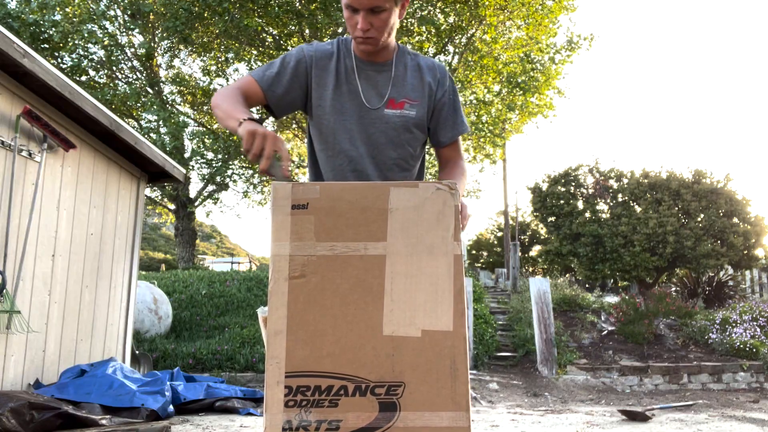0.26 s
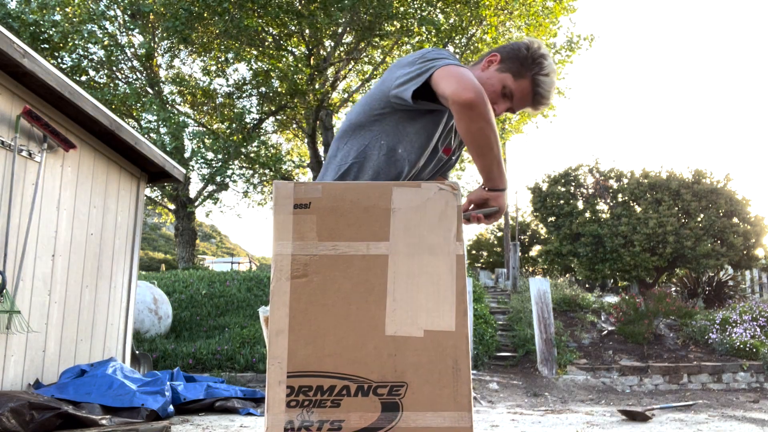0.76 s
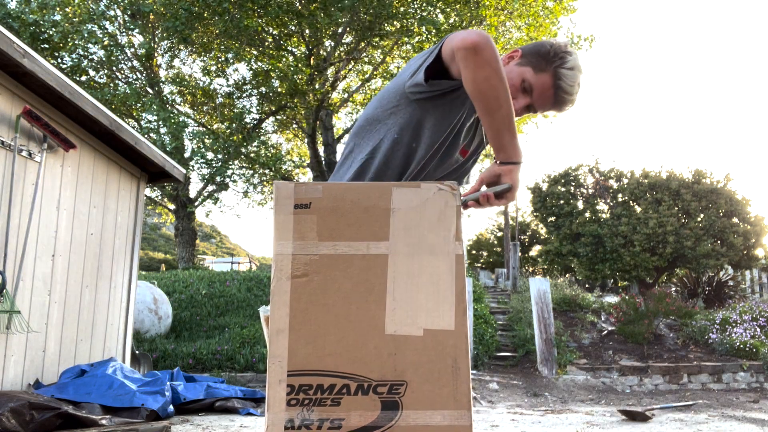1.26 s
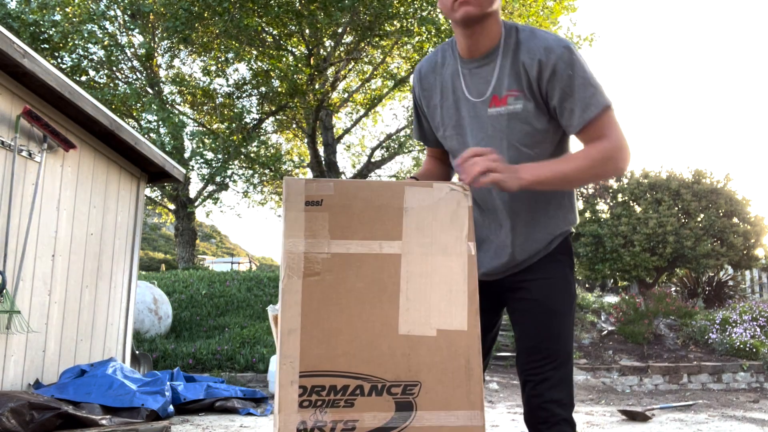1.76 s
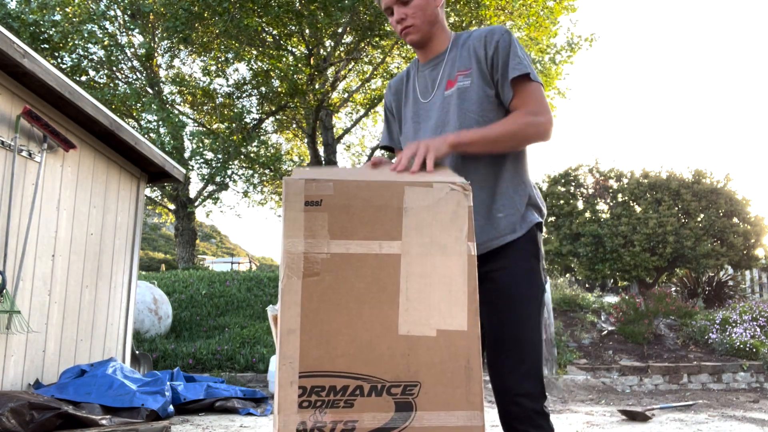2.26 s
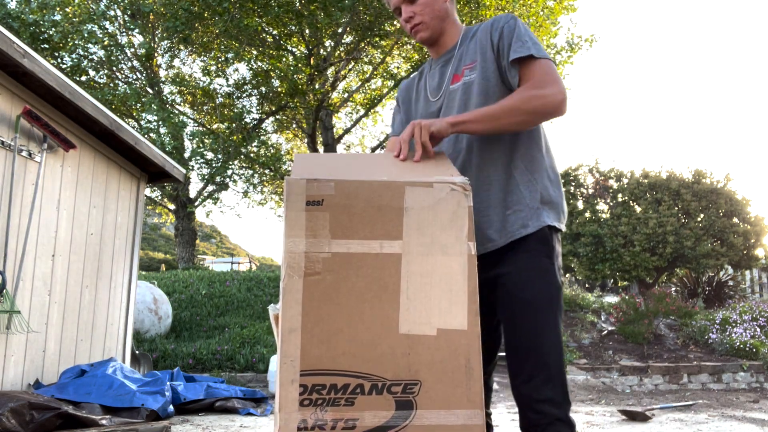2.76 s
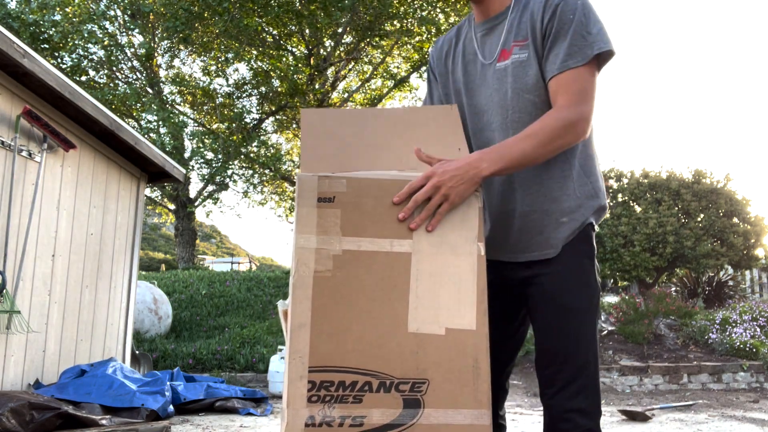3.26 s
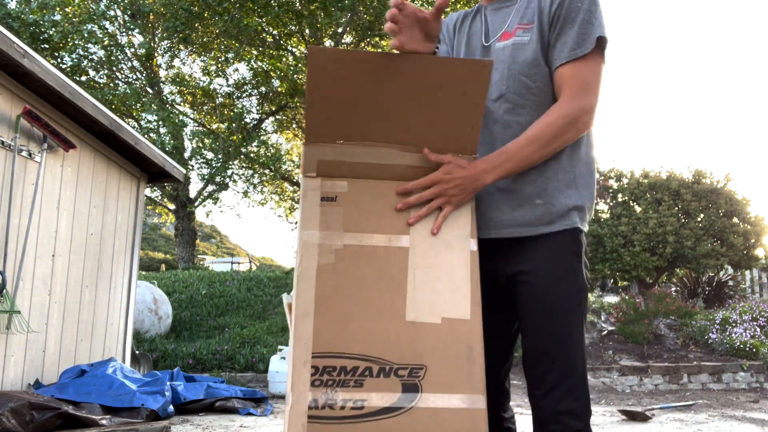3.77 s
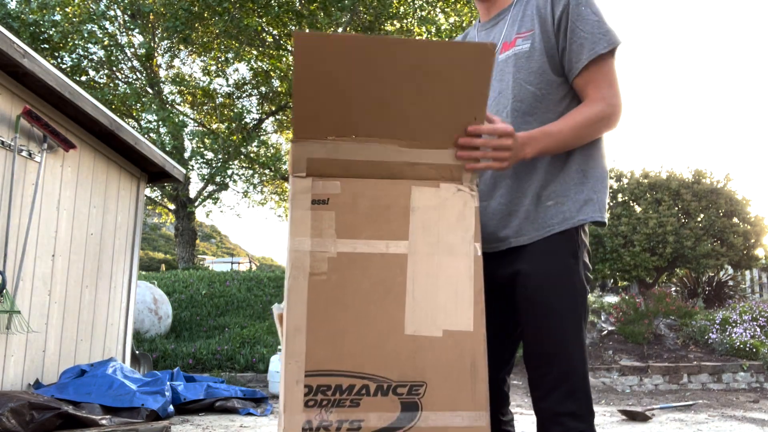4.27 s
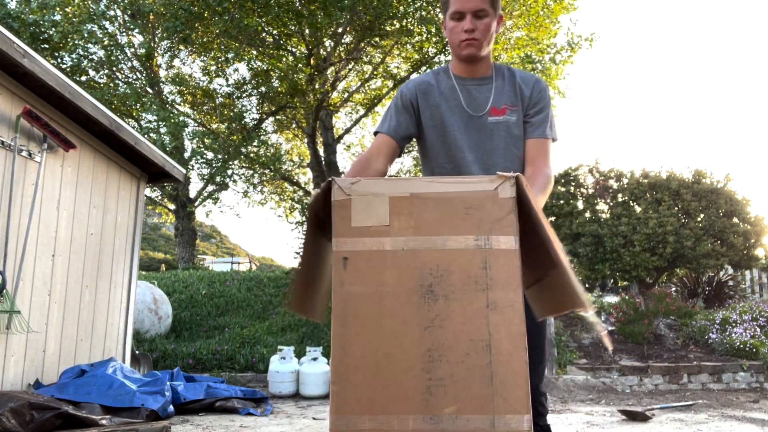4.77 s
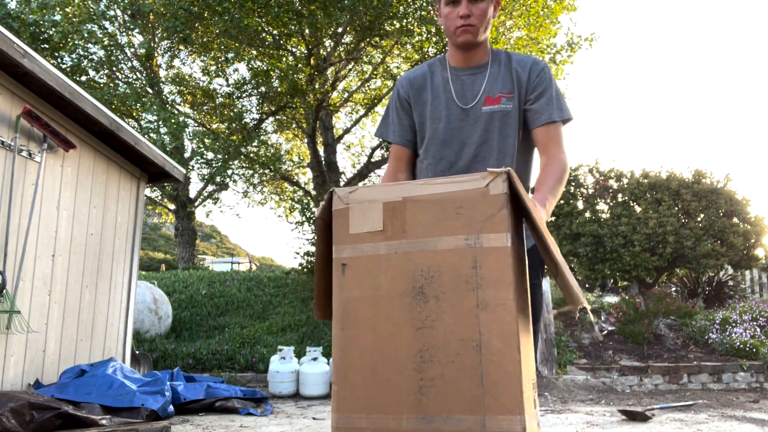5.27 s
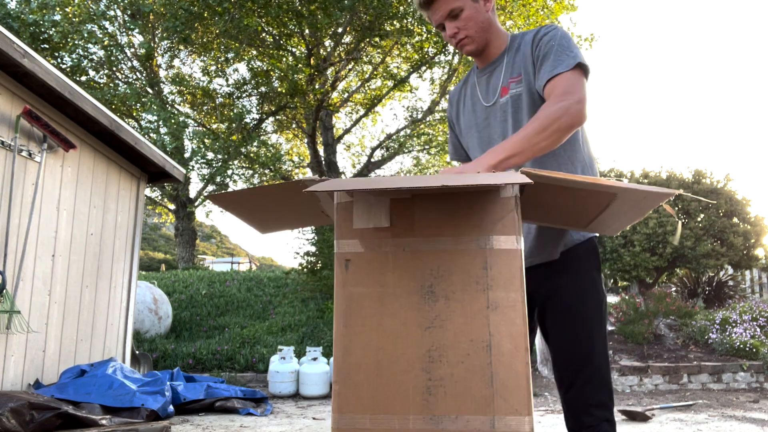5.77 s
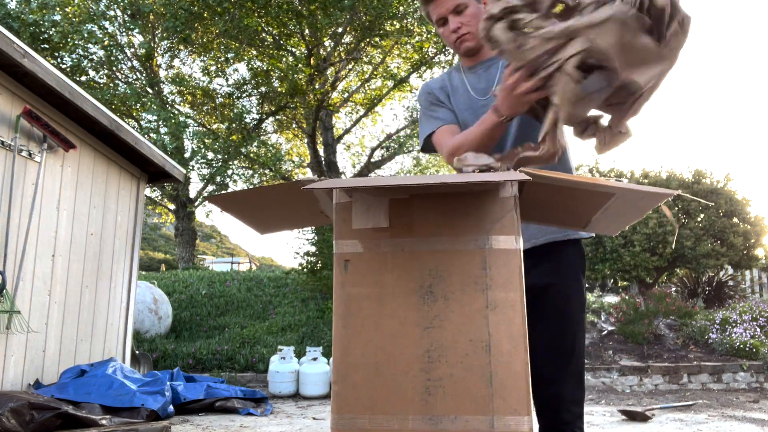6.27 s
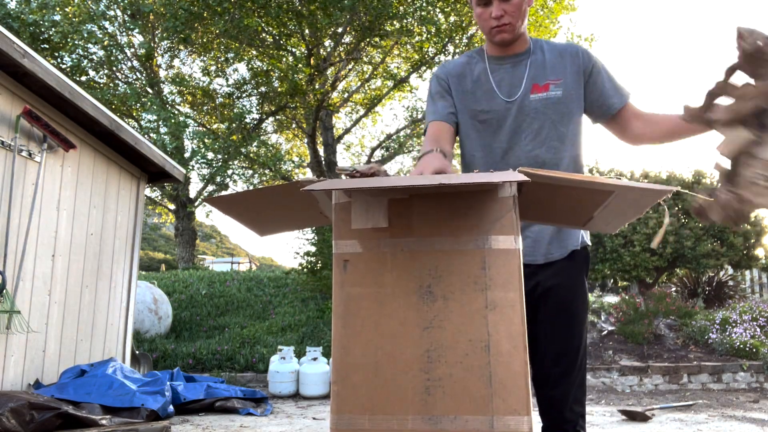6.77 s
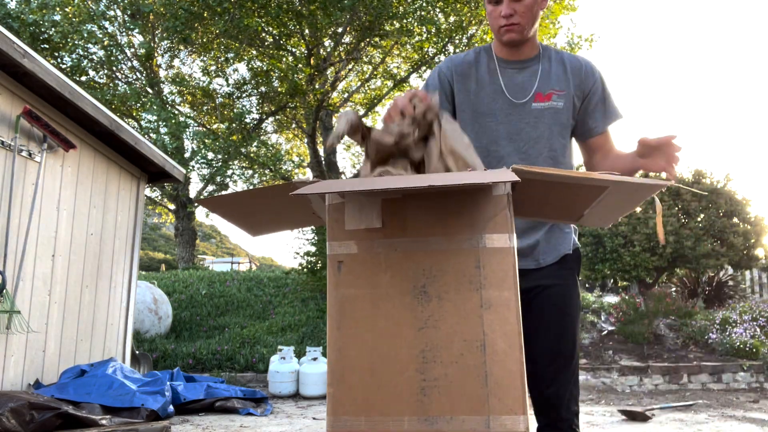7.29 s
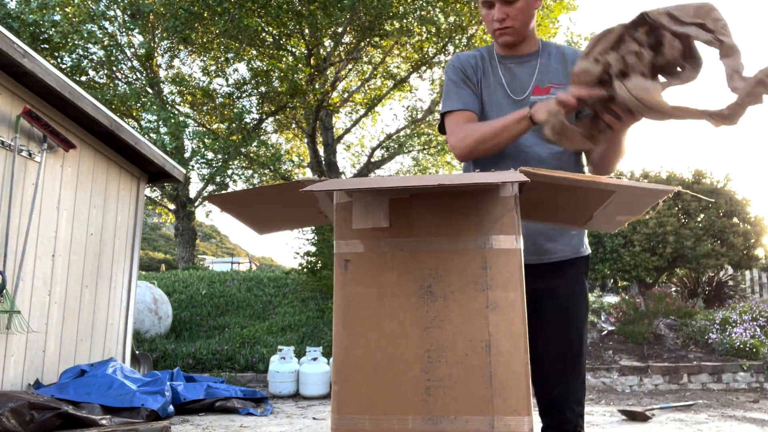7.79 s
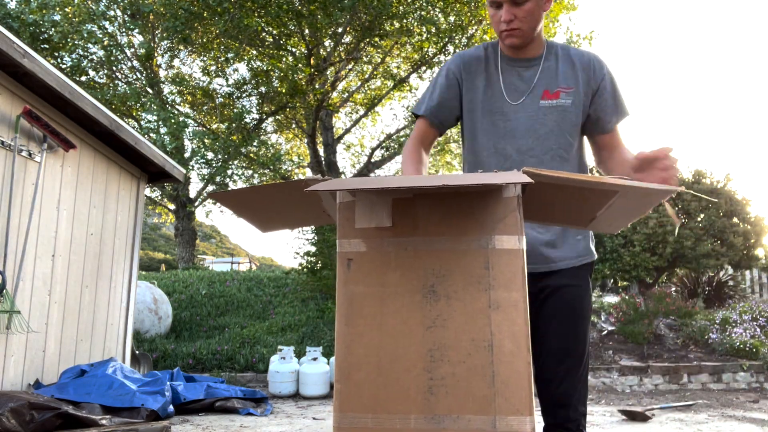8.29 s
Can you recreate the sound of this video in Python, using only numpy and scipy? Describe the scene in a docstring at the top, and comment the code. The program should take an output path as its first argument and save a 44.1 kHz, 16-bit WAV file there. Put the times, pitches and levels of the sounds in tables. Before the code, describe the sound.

A blade saws and snaps through tape on a big hollow cardboard box, flaps bang and slap open, then packing paper crinkles out in armfuls.

```python
"""Outdoors by a shed wall, a tall cardboard box is opened and crumpled paper is pulled out in armfuls.
Hands and a sawing blade are noises shaped by a stick-slip grip; knocks, thumps and catches are damped modes;
snaps are short noise bursts, slaps are dispersed bending waves and drags feed a resonance. Paper is clumped
noise with single damped tones; the yard adds noisy tails, and distant traffic hums as slowly varying noise."""
import sys
import numpy as np
from scipy import signal
from scipy.fft import rfft, irfft, next_fast_len
from scipy.io import wavfile
from scipy.ndimage import uniform_filter1d, map_coordinates

SR = 44100
rng = np.random.default_rng(int(sys.argv[2]) if len(sys.argv) > 2 else 0)


def to_wav(sig):
    """Store sig (one row per channel, or 1-D mono) as 16-bit WAV at the path in sys.argv[1].

    Samples outside -1..1 are clipped; the rate is SR.
    """
    pcm = np.clip(np.atleast_2d(sig), -1, 1) * 32767
    pcm = np.round(pcm).astype(np.int16)
    wavfile.write(sys.argv[1], SR, pcm.T)  # frames by channels


N = 376613
BOX_PART, PAPER_PART = slice(0, round(5.9 * SR)), slice(round(5.6 * SR), N)  # samples

# Paper on the move. Each row: time in seconds, crinkle level in dB, flutter level in dB.
PAPER_MOTION = [(5.758, -52, -45.5), (5.82, -44, -42), (6.08, -37.5, -44), (6.13, -39, -48),
                (6.17, -41.5, -42), (6.185, -36, -45), (6.34, -35.5, -40.5), (6.4, -35.5, -54),
                (6.425, -44.5, -52), (6.45, -45.5, -52), (6.47, -36.5, -50), (6.66, -36.5, -48),
                (6.705, -41, -54), (6.72, -47.5, -48), (6.75, -45, -64), (6.83, -48.5, -49),
                (6.91, -46.5, -46), (6.96, -48, -42), (7.03, -41, -43), (7.09, -38, -44.5),
                (7.1, -38.5, -38.5), (7.18, -39.5, -40), (7.24, -33.5, -34), (7.275, -37.5, -38),
                (7.38, -37.5, -36.5), (7.47, -39.5, -42.5), (7.59, -41.5, -49), (7.68, -34, -43.5),
                (7.84, -36, -45), (7.87, -49, -55), (7.95, -48.5, -66), (7.99, -38.5, -51),
                (8.03, -38.5, -41.5), (8.1, -41, -45), (8.19, -33, -34.5), (8.205, -41, -36.5),
                (8.23, -42.5, -35.5), (8.54, -33.5, -36.5)]
# The blade catches on the flutes of the board, mostly higher as the cut shortens the free edge.
# Each row: start in seconds, relative level in dB, base pitch in hertz.
BLADE_CATCHES = [(0.99, -25, 995), (1.035, -24.5, 1034), (1.068, -26, 970), (1.1, -30.5, 1000),
                 (1.128, -27.5, 1245), (1.161, -32, 940), (1.176, -25, 1120), (1.199, -25.5, 1250),
                 (1.21, -29.5, 1200), (1.238, -45, 1170), (1.254, -28, 1190), (1.301, -28.5, 1140),
                 (1.313, -33, 1100), (1.337, -29, 1484), (1.409, -31.5, 1980), (1.434, -31, 1890),
                 (1.82, -40, 1210), (1.855, -34.5, 830)]


def amp(db):
    """The decibel law: a level in dB as an amplitude ratio."""
    return 10 ** (np.asarray(db) / 20)


def unit(x):
    """Normalisation to unit root-mean-square amplitude."""
    return x / np.sqrt(np.mean(x ** 2) + 1e-20)


def along(points, hz):
    """Interpolation of (hertz, value) points on a logarithmic frequency axis."""
    f, v = np.transpose(points)
    return np.interp(np.log(hz + 1), np.log(f + 1), v)


def curves(rows):
    """Level envelopes: one gain per sample for each dB column, at -120 dB outside the table."""
    s, *cols = np.transpose(rows)
    return [amp(np.interp(np.arange(N) / SR, s, c, -120, -120)) for c in cols]


def wobble(rate):
    """Slow modulation: a smooth random curve with rate knots a second."""
    return map_coordinates(rng.standard_normal(int(N * rate / SR) + 4), [np.arange(N) * rate / SR])


def filtered(x, response):
    """Linear filtering: the spectrum of x times a response of frequency."""
    m = next_fast_len(N + 8192)
    return irfft(rfft(x, m) * response(np.fft.rfftfreq(m, 1 / SR)), m)[..., :N]


def high_pass(hz, corner_hz, power):
    """High-pass response: a gain of one half at the corner, rising to one above it."""
    return hz ** power / (hz ** power + corner_hz ** power)


def jerks(events, t60):
    """Impulsive excitation: (second, strength) rows as sudden rises with exponential decay."""
    kicks = np.zeros(N)
    for s, strength in events:
        kicks[round(s * SR)] = strength
    return signal.lfilter([1], [1, -amp(-60 / (t60 * SR))], kicks)


def slips(rate, spread_db, t60, steady):
    """Stick-slip friction: sudden releases of uneven size over a steady contact."""
    kicks = (rng.random(N) < rate / SR) * amp(spread_db * rng.standard_normal(N))
    fade = amp(-60 / (t60 * SR))
    return steady + unit(signal.lfilter([1], [1, -fade], kicks))


def rub(grip, spectrum, patchy_db, part=slice(0, N)):
    """Friction noise: a patchy noise pair, shared and scattered, shaken by the grip and coloured."""
    pair, size = np.zeros((2, N)), part.stop - part.start
    cells = signal.stft(rng.standard_normal((2, size)), nperseg=256)[2]
    patches = uniform_filter1d(rng.standard_normal(cells.shape[1:]), 6, 0)
    patches = unit(uniform_filter1d(patches, 10, 1))
    pair[:, part] = signal.istft(cells * amp(patchy_db * patches), nperseg=256)[1][:, :size]
    coloured = filtered(pair * grip, lambda hz: amp(along(spectrum, hz)))
    return unit(coloured) * np.sqrt(size / N)  # a shorter part keeps its own loudness


def blows(events, modes, attack, sag, gain_db, scatter=0.04):
    """Modal ringing: blows excite damped modes at new strengths, and the pitch sags as slow waves arrive last."""
    out = np.zeros(N + SR)
    t = np.arange(round(SR * max(row[3] for row in events))) / SR
    draws = rng.standard_normal((len(events), 2, len(modes)))
    for (s, db, hz, t60), (level, detune) in zip(events, draws):
        warp = t + sag * t60 / 4 * (1 - np.exp(-4 * t / t60))
        ring = np.zeros(len(t))
        for (ratio, mode_db), a, d in zip(modes, level, detune):
            # higher modes die sooner
            envelope = amp(mode_db + a - 60 * t * ratio ** 1.31 / t60)
            ring += envelope * np.sin(2 * np.pi * hz * ratio * (1 + scatter * d) * warp)
        out[round(s * SR):][:len(t)] += amp(db + gain_db) * ring * (1 - np.exp(-t / attack))
    return out[:N]


def strokes(column, release_t60):
    """Contact envelope: every stroke swells, holds and decays exponentially over a faint background level."""
    # Background level under the strokes. Each row: time in seconds, then hiss, wall noise and rumble in dB.
    background_rows = [(0, -68.5, -65, -52), (1.65, -77.5, -67, -48), (1.75, -65.5, -56, -47),
                       (2.3, -59, -57, -49), (2.6, -78, -66, -48.5), (2.78, -58, -54, -46),
                       (4.5, -54.5, -52, -73), (5.0, -62, -49.5, -51), (5.75, -58.5, -54.5, -66)]
    # Hands and blade dragging. Each row: start and length in seconds, then hiss, wall and boom levels in dB.
    stroke_rows = [(-0.02, .36, -46, -40.5, -38), (0.633, 0.031, -60, -54.5, -48),
                   (0.757, 0.095, -45.5, -33.5, -36), (0.882, 0.066, -55.5, -50, -37),
                   (0.979, 0.33, -52, -47.5, -39), (1.066, 0.057, -47.5, -47, -59),
                   (1.31, 0.14, -51, -39.5, -34.5), (1.59, 0.075, -43, -35.5, -35.5),
                   (1.754, 0.14, -67, -58.5, -60), (2.038, 0.038, -62, -55, -46),
                   (2.222, 0.049, -45.5, -42, -72), (2.261, 0.075, -49.5, -41.5, -46),
                   (2.79, 0.049, -50, -51, -65), (2.88, 0.022, -51.5, -72, -66),
                   (2.995, 0.015, -54.5, -63, -60), (3.015, 0.17, -67, -48.5, -40.5),
                   (3.08, 0.054, -49.5, -59, -62), (3.293, 0.026, -60, -77, -56),
                   (3.287, 0.81, -94, -55, -49.5), (3.606, 0.028, -32.5, -20.5, -32),
                   (3.783, 0.17, -55, -43.5, -38), (4.145, 0.11, -49.5, -49, -47.5),
                   (4.32, 0.076, -83, -43, -46), (4.473, 0.095, -77, -64, -65),
                   (4.68, 0.059, -54.5, -80, -69), (4.824, 0.12, -72, -47.5, -46),
                   (5.085, 0.047, -44, -27.5, -47), (5.143, 0.049, -38.5, -25.5, -56),
                   (5.206, 0.063, -39.5, -27, -52), (5.314, 0.066, -49, -40.5, -53),
                   (5.415, 0.069, -43.5, -31, -56), (5.511, 0.048, -52, -37.5, -55),
                   (5.68, 0.011, -57, -54, -60)]
    attack_s = 0.015
    t, gain = np.arange(N) / SR, curves(background_rows)[column]
    for s, length, *db in stroke_rows:
        span = slice(round(max(s, 0) * SR), round((s + length + release_t60) * SR))
        swell = np.clip((t[span] - s) / attack_s, 0, 1)
        after = np.clip(t[span] - s - length, 0, None)
        gain[span] += swell * amp(db[column] - 60 * after / release_t60)
    return gain


def hands():
    """Friction: one stick-slip grip drives surface hiss and corrugated wall, jerking at each blade catch."""
    # Spectra of surface and wall. Each row: frequency in hertz, relative density in dB per hertz.
    hiss_spectrum = [(880, -44), (1500, -16), (2390, 0.5), (2590, 2.5), (3310, 1.5), (3620, 5.5), (4330, 4),
                     (11200, 0.5), (14300, -3.5), (16000, -40)]
    wall_spectrum = [(150, -6.5), (250, -3), (337, -3), (536, -3), (706, -9.5), (780, -8), (1130, -11),
                     (2380, -17), (3500, -25.5), (4550, -70), (7700, -120)]
    jerk_db = 46.5  # relative to the level of the catch
    hiss, wall = [strokes(column, release_t60=0.15) for column in range(2)]
    catch_jerks = jerks([(s, amp(db + jerk_db)) for s, db, _ in BLADE_CATCHES], t60=0.042)
    grip = slips(rate=130, spread_db=0.5, t60=0.0069, steady=2.9) + catch_jerks
    surface = hiss * rub(grip, hiss_spectrum, patchy_db=2.5, part=BOX_PART)
    return surface + wall * rub(grip, wall_spectrum, patchy_db=3.5, part=BOX_PART)


def catches():
    """Edge vibration: each catch of the blade rings the damped modes of the cut edge."""
    # Modes of the cut edge. Each row: ratio to the base pitch, relative level in dB.
    edge_modes = [(1, 0), (1.1, 0), (.55, -8.5), (2.1, -8)]
    ring_t60 = 0.037  # seconds, at ratio 1
    events = [(*row, ring_t60) for row in BLADE_CATCHES]
    return blows(events, edge_modes, attack=0.0014, sag=0.039, gain_db=-2.5, scatter=0.031)


def snaps():
    """Sudden release of tension: a wide crack and a short tearing hiss, thin tape bright, thick board dull."""
    # Tape and creases letting go. Each row: start in seconds, level in dB, treble in dB relative to it.
    snap_rows = [(0.163, -20, -9.5), (0.076, -36, -11), (0.187, -46, 0), (0.2105, -19.5, -17.5),
                 (0.2526, -31.5, -3.5), (0.289, -15, -19), (0.3, -21, -16), (0.3236, -29, 0),
                 (0.5267, -49, -20), (0.613, -42.5, -21), (0.7687, -39, -14), (0.7906, -23, -19),
                 (0.8195, -32, -3), (0.8964, -26, -12), (0.9348, -36, -7.5), (1.408, -40, -5),
                 (1.437, -42, -5), (1.462, -42.5, -1), (1.5903, -45, -3), (1.6622, -28.5, -2.5),
                 (1.7431, -30, -19), (1.803, -49.5, 1), (2.2682, -14.5, -17.5), (2.2925, -25, -10),
                 (2.7514, -34, -13.5), (2.7955, -30, -34), (2.982, -48, -7), (3.085, -41, -25),
                 (3.1354, -40, -1), (3.1626, -25, -19), (3.174, -46, -12), (3.1823, -38.5, -7),
                 (3.396, -46, -10), (3.493, -23, -35), (3.6179, 0.5, -21), (3.6272, -19, -9),
                 (3.6759, -17.5, -11.5), (3.756, -44, -19), (3.8046, -29, -8), (3.845, -24.5, -25),
                 (4.0345, -22.5, -46), (4.0477, -28, -41), (4.0888, -25.5, -38), (4.3515, -25.5, -25),
                 (4.373, -37, -13), (4.412, -43, -24), (4.4889, -25, -30), (4.5605, -15.5, -36),
                 (4.825, -25, -42), (4.876, -24.5, -39), (4.9347, -29, -41), (4.9765, -33, -25),
                 (5.0075, -26, -45), (5.079, -24.5, -26), (5.0978, -23, -23), (5.1088, -23.5, -7.5),
                 (5.1155, -12.5, -24), (5.186, -19.5, -9.5), (5.2148, -9, -19), (5.2385, -12, -23.5),
                 (5.2605, -16, -29), (5.3203, -38, 5), (5.385, -25, -15), (5.3945, -20.5, -17),
                 (5.4111, -12.5, -18), (5.4345, -2, -34), (5.445, -7, -22.5), (5.4725, -17, -29),
                 (5.5247, -20, -21), (5.5673, -27, -14.5), (6.0945, -36, 3), (6.194, -42, -6),
                 (6.2855, -29, -3), (6.2915, -26, -13), (6.307, -27, -14), (6.341, -40, 5),
                 (6.4687, -43, -8), (6.83, -34.5, -8), (6.997, -45, -10), (7.095, -32, -18),
                 (7.0449, -40, -16), (7.202, -32, 3), (7.481, -42, 8), (7.989, -39, -9), (8.1085, -41, -6)]
    # Spectrum of a crack. Each row: frequency in hertz, relative density in dB per hertz.
    crack_spectrum = [(470, -28), (800, -15), (1240, -19), (2100, -19.5), (3880, -6.5), (4570, -6),
                      (7000, -5), (7830, -3), (12100, -16.5), (16000, -20)]
    tear_db, tear_treble_db = -13, -6  # tape tearing: relative to the catch, relative to the tear
    tape_ends_s = 1.27  # past this the blade only catches on bare board
    out, t = np.zeros((2, N + SR)), np.arange(900) / SR
    shape = amp(-60 * t / .005) + .16 * amp(-60 * t / .035)  # crack and tearing hiss
    tears = [(s, db + tear_db, tear_treble_db) for s, db, _ in BLADE_CATCHES if s < tape_ends_s]
    rows = [*snap_rows, *tears]
    for (s, db, treble_db), noise in zip(rows, rng.standard_normal((len(rows), len(t)))):
        burst = shape * unit(noise * shape)
        out[:, round(s * SR):][:, :len(t)] += amp([[db], [db + treble_db]]) * burst

    def two_bands(hz):
        """Crossover: complementary gains for the dull and the bright part of the crack."""
        treble = high_pass(hz, 2300.0, 4)
        return amp(along(crack_spectrum, hz)) * np.array([1 - treble, treble])

    return amp(8.5) * filtered(out[:, :N], two_bands).sum(0)


def knocks():
    """Plate vibration: raps ring the modes of walls and flaps, the softer raps for longer."""
    # Raps on walls and flaps. Each row: start in seconds, relative level in dB, base pitch in hertz.
    knock_rows = [(0.026, -21, 380), (0.076, -14, 386), (0.141, -31, 504), (0.16, -13, 410),
                  (0.211, -9, 500), (0.252, -23, 566), (0.292, -12.5, 523), (0.662, -30, 583),
                  (0.772, -4.5, 594), (0.79, -6, 420), (0.806, -7.5, 400), (0.819, -11, 574),
                  (0.895, -21, 670), (0.935, -27, 540), (1.595, -27, 410), (1.64, -28, 890),
                  (1.666, -5, 494), (1.671, -14, 1046), (2.232, -36, 445), (2.268, -6, 437),
                  (2.275, -5.5, 497), (2.293, -7, 740), (2.3, -3.5, 428), (2.608, -28, 476),
                  (2.795, -22.5, 465), (3.101, -21, 393), (3.174, -29, 1070), (3.204, -24, 428),
                  (3.33, -26, 534), (3.395, -11.5, 578), (3.6178, 1.5, 1093), (3.633, 10, 450),
                  (3.793, -22, 435), (3.975, -16, 460), (4.0334, -23.5, 650), (4.488, -29, 610),
                  (4.56, -23, 362), (4.823, -36, 453), (5.007, -15, 854), (5.019, -19, 797),
                  (5.08, -20, 730), (5.097, -8, 822), (5.116, -9, 370), (5.144, -14, 1000),
                  (5.185, -5.5, 857), (5.213, -5, 853), (5.26, -10, 486), (5.32, -17, 917),
                  (5.4111, -13, 452), (5.435, -9.5, 514), (5.445, -14, 380), (5.52, -23, 520),
                  (5.566, -21, 470), (5.683, -22.5, 422), (7.931, -14, 566)]
    # Modes of a struck panel. Each row: ratio to the base pitch, relative level in dB.
    panel_modes = [(0.899, 1.5), (1.52, -2), (2.04, -5), (2.1, -23), (0.709, -5)]
    ring_t60 = 0.022  # seconds, for a rap of 0 dB at ratio 1
    soft_rings = 0.15  # dB of longer ring per dB softer
    raps = [(s, db, hz, ring_t60 * amp(-soft_rings * db)) for s, db, hz in knock_rows]
    return blows(raps, panel_modes, attack=0.0013, sag=0.3, gain_db=-7.0)


def slaps():
    """Dispersion: a bending wave spreads on its way, treble at once and bass trailing in a falling sweep."""
    # Hard slaps on the board. Each row: start in seconds, relative level in dB.
    slap_rows = [(0.772, -20), (2.268, -11), (2.294, -21), (3.395, -22), (3.618, 3), (4.0345, -23),
                 (4.174, -27.5), (4.462, -31), (4.825, -23), (5.098, -4.5), (5.1856, -1), (5.214, -6),
                 (5.26, -8), (5.32, -16), (5.411, -6), (5.4345, -5.5), (5.522, -16.5), (5.568, -14.5),
                 (5.682, -23)]
    # Spectrum of the bending wave. Each row: frequency in hertz, relative density in dB per hertz.
    bend_spectrum = [(50, -80), (95, -16), (200, 6), (500, -3), (1100, 0), (2200, -20), (5000, -29),
                     (16000, -50)]
    bend_s, bend_power = 0.0022, 1.1  # delay near 1 kHz in seconds; how steeply lower waves lag
    kicks = np.zeros(N)
    for s, db in slap_rows:
        kicks[round(s * SR)] = amp(db + 22)

    def dispersed(hz):
        """Dispersion: the slope of this phase over frequency is the arrival delay."""
        power = 1 - bend_power
        lag = 2 * np.pi * bend_s * 1e3 * ((hz + 50) / 1e3) ** power / power
        return amp(along(bend_spectrum, hz)) * np.exp(-1j * lag)

    return filtered(kicks, dispersed)


def double_click():
    """Comb colouring: two cracks close together colour a pop, drawn as damped tones about 1.2 kHz apart."""
    # Spectral peaks of the pop. Each row: base pitch in hertz, relative level in dB.
    comb_peaks = [(2650, -9), (3900, -4), (5070, -10), (5980, -34), (6860, -21)]
    start_s, tone_t60 = 3.6175, 0.012
    events = [(start_s, db, hz, tone_t60) for hz, db in comb_peaks]
    return blows(events, [(0.95, 0)], attack=0.00043, sag=0, gain_db=3.0, scatter=0)


def drags():
    """Driven resonance: a jerky contact keeps one panel singing for as long as the drag lasts."""
    # Singing drags. Each row: start in seconds, length in seconds, level in dB, pitch in hertz.
    drag_rows = [(0.0, 0.28, -40.5, 516), (1.237, 0.088, -46, 1110), (1.3, 0.055, -47, 1530),
                 (1.353, 0.089, -47.5, 1980), (3.856, 0.087, -39, 511), (3.858, 0.024, -45, 1200),
                 (5.144, .04, -30, 980), (6.937, 0.075, -46.5, 436), (7.686, 0.1, -44.5, 1140)]
    sharpness_q, fade_s = 5.2, .05
    out, t = np.zeros(N), np.arange(N) / SR
    grit = slips(rate=93, spread_db=1, t60=0.045, steady=0.65) * rng.standard_normal(N)
    for s, length, db, hz in drag_rows:
        span = slice(round(s * SR), round((s + length + fade_s) * SR))
        ring = signal.iirpeak(hz, sharpness_q, SR)
        sung = unit(signal.lfilter(*ring, signal.lfilter(*ring, grit[span])))
        envelope = np.interp(t[span] - s, [0, .01, length, length + fade_s], [0, 1, 1, 0])
        out[span] += sung * amp(db) * envelope
    return out


def thumps():
    """Coupled resonators: dull blows ring the box walls and the slower-dying air inside."""
    # Dull blows. Each row: start in seconds, wall level in dB, wall base pitch in hertz, air level in dB.
    thump_rows = [(0.009, -17.5, 144, -53), (0.832, -13.5, 104, -46), (0.901, -21, 207, -48),
                  (1.042, -19.5, 129, -48), (1.109, -17, 112, -48), (1.321, -17.5, 175.5, -44),
                  (1.627, -22.5, 319, -38), (1.659, -21, 168, -47), (2.268, -11, 156, -45),
                  (2.297, -13, 135, -38), (2.605, -24, 141, -33), (2.753, -21, 186, -30.5),
                  (2.903, -31, 132, -36), (3.027, -12, 98, -30), (3.094, -16, 285, -32),
                  (3.324, -21, 225, -50), (3.408, -30, 99, -49), (3.633, -7.5, 390, -9),
                  (3.646, -4, 128.6, -33), (4.175, -31, 91, -32.5), (4.359, -27, 97, -34),
                  (4.519, -20.5, 153, -61), (5.105, -11.5, 152, -39), (5.184, -2.5, 161, -48),
                  (5.218, -16, 187, -55), (5.262, -17, 200, -55), (5.412, -14.5, 177, -55),
                  (5.434, -7, 162, -38), (5.462, -18, 167, -55), (5.569, -19.5, 150, -55),
                  (7.217, -24, 178, -48), (7.382, -18.5, 88, -50), (7.481, -44, 89.5, -30)]
    # Modes of the box walls. Each row: ratio to the base pitch, relative level in dB.
    wall_modes = [(0.95, 1.5), (.7, -5.5), (1.448, -6.5), (1.374, -3.5)]
    wall_t60, air_t60 = 0.083, 0.1  # seconds, at ratio 1
    air_hz = 66  # base pitch
    wall_events = [(s, db, hz, wall_t60) for s, db, hz, _ in thump_rows]
    air_events = [(s, air_db, air_hz, air_t60) for s, _, _, air_db in thump_rows]
    walls = blows(wall_events, wall_modes, attack=0.0072, sag=0.22, gain_db=-1.0)
    return walls + blows(air_events, [(0.92, 0)], attack=0.003, sag=0.1, gain_db=5.5)


def boom():
    """Cavity excitation: the big box rumbles in lumps as it or the paper is handled, over a faint rumble."""
    # Spectrum of the rumble. Each row: frequency in hertz, relative density in dB per hertz.
    boom_spectrum = [(15, -42), (25, -24), (61, 6), (91, 6.5), (160, 3.5), (189, 2.5), (220, -8.5),
                     (303, -6), (350, -27), (460, -12.5), (770, -120)]
    paper_boom_db, growth = -51.5, 1.3  # level under a -40 dB flutter; dB per dB of flutter
    flutter = curves(PAPER_MOTION)[1]
    level = strokes(column=2, release_t60=0.28)
    level = level + amp(paper_boom_db) * (flutter / amp(-40.0)) ** growth
    return level * rub(amp(2.5 * wobble(25)), boom_spectrum, patchy_db=1)


def grains():
    """Buckling: single creases as damped tones of scattered pitch and size, more or less alike at the ports."""
    rate, middle_hz, life_cycles = 1600, 3170, 1.64  # creases per second, pitch, cycles to fall to 1/e
    when, pitch, size, side = rng.random((9000, 4)).T
    start = (5.6 + np.cumsum(-np.log(when)) / rate) * SR  # random waits, exponentially distributed
    hz, t = middle_hz * 3.6 ** (2 * pitch - 1)[:, None], np.arange(160) / SR
    tone = np.sin(2 * np.pi * hz * t) * np.exp(-t * hz / life_cycles)
    tone = tone * amp(-4.0 * np.log(size + 0.0096))[:, None]  # a few creases are far louder
    at = (start.astype(int)[:, None] + np.arange(len(t))).ravel()
    gains = (np.ones_like(side), 2 * side - 1)  # shared and scattered parts
    pair = np.array([np.bincount(at, (tone * g[:, None]).ravel(), N)[:N] for g in gains])
    return pair / np.std(pair[0, PAPER_PART])


def paper():
    """Buckling and flutter: creases give way in clumps, harder at each tug, and the sheets flutter below."""
    # Sudden pulls on the sheets. Each row: start in seconds, strength.
    tug_rows = [(6.19, 0.14), (6.465, 0.34), (7.09, 0.58), (7.2, 0.87), (8.107, 1.54)]
    # Spectra of crinkle and flutter. Each row: frequency in hertz, relative density in dB per hertz.
    crinkle_spectrum = [(880, -14), (1500, -7), (2690, -3.5), (5600, -5.5), (8000, -7.5), (10800, -10),
                        (13500, -17), (14600, -15), (15100, -49), (16000, -46)]
    flutter_spectrum = [(150, -8), (250, -7.5), (425, 0.5), (515, 0.5), (687, -4.5), (1170, -4),
                        (1490, -9.5), (2500, -15.5), (3250, -45), (5500, -120)]
    grain_db = -7.5  # single creases, relative to the crinkle
    crinkle, flutter = curves(PAPER_MOTION)
    creases = slips(rate=360, spread_db=5.0, t60=0.0078, steady=4.6) * amp(1.15 * wobble(40))
    creases = creases * (1 + jerks(tug_rows, t60=0.25))
    folds = creases * slips(rate=45, spread_db=2.5, t60=.08, steady=3)
    crackle = rub(creases, crinkle_spectrum, patchy_db=2.0, part=PAPER_PART)
    crackle = crackle + amp(grain_db + 2.6 * wobble(18)) * grains()
    return crinkle * crackle + flutter * rub(folds, flutter_spectrum, patchy_db=1.5, part=PAPER_PART)


def yard(x):
    """Diffuse reverberation: ground and shed wall scatter hits into two noisy tails, decaying by frequency."""
    # Decay of the yard. Each row: frequency in hertz, reverberation time in seconds.
    decay_times = [(100, 0.28), (1000, 0.1), (10000, 0.011)]
    hz, t, z = signal.stft(x, SR, nperseg=256)
    keep = amp(-60 * t[1] / along(decay_times, hz)) ** 2  # energy kept from frame to frame
    energy = np.abs(z) ** 2
    power = np.array([signal.lfilter([0, 1 - k], [1, -k], row) for k, row in zip(keep, energy)])
    noise = signal.stft(rng.standard_normal((2, N)), SR, nperseg=256)[2]
    tails = unit(np.abs(noise)) * np.exp(1j * np.angle(noise)) * np.sqrt(power)
    return signal.istft(tails, SR, nperseg=256)[1][:, :N]


def traffic():
    """Distant broadband source: traffic as coloured noise with a slowly wandering level."""
    # Spectrum of the traffic. Each row: frequency in hertz, relative density in dB per hertz.
    far_spectrum = [(15, -21), (25, -12), (40, -4), (64, 8), (123, 4.5), (301, -29), (659, -39),
                    (1890, -27), (2350, -28), (4140, -31), (7510, -67), (11300, -89), (14000, -56),
                    (16000, -91)]
    return amp(-53 + 1.5 * wobble(3)) * rub(1, far_spectrum, patchy_db=1.2)


def ports(pair, lead):
    """Interchannel coherence: the left is shifted in phase, mostly lagging; the scattered part has opposite signs."""
    # Left-right likeness of the finished stereo sound, almost mono in the top treble.
    # Each row: frequency in hertz, likeness from 0 to 1.
    likeness = [(60, 0.94), (300, 0.92), (1000, 0.71), (3000, 0.38), (6000, 0.25), (12000, 0.96)]
    # Level difference of the two sides. Each row: frequency in hertz, left minus right in dB.
    level_lean = [(60, 1), (110, 0), (200, -0.5), (380, 0), (700, -1.5), (1290, -1.5), (2380, 0),
                  (4400, -4.5), (8120, -1.5), (15000, 1)]
    m = next_fast_len(N + 8192)
    hz = np.fft.rfftfreq(m, 1 / SR)
    turn = np.arccos(np.clip(along(likeness, hz), 0, 1)) / 2
    mid, side = rfft(pair, m) * [np.cos(turn), np.sin(turn)]
    lean = amp(along(level_lean, hz) / 2)
    left = (mid + side) * lean * np.exp(1j * np.interp(hz, *np.transpose(lead)))
    return irfft(np.array([left, (mid - side) / lean]), m)[:, :N]


def scene():
    """Superposition: struck sounds with their tails, friction, paper and traffic add at the two ports."""
    # Phase of the left microphone port, for a source ahead or out to the right.
    # Each row: frequency in hertz, phase in radians (negative where the left lags).
    lead_ahead = [(0, 0), (300, -.3), (1290, -.5), (2410, -1.3), (3190, -1.2), (4740, -3.6), (5600, -5.3),
                  (7800, -2.9), (9220, -2.2), (11100, -.1), (14600, 2.9)]
    lead_right = [(0, 0), (1030, -1), (2600, -3.1), (5000, -6.3), (7800, -9.3), (9220, -8.5), (11100, -6.4),
                  (14600, -3.4)]
    # Paper swung out to the right. Each row: time in seconds, share from 0 to 1.
    swing = [(0, 0), (6.2, 0), (6.28, 1), (6.72, 1), (6.8, 0), (7.55, 0), (7.68, 1), (8.12, 1), (8.2, 0)]
    hits = knocks() + thumps() + snaps() + catches() + slaps() + drags() + double_click()
    tails = filtered(yard(hits), lambda hz: high_pass(hz, 65.0, 2))
    # the direct sound is wholly shared by the ports
    struck = hits * [[1], [0]] + amp([[-11], [-8]]) * tails
    struck = filtered(struck, lambda hz: high_pass(hz, 55.0, 8))  # keeps sub-bass out of the struck sounds
    aside, sheets = np.interp(np.arange(N) / SR, *np.transpose(swing)), paper()
    ahead = struck + hands() + boom() + traffic() + (1 - aside) * sheets
    return ports(ahead, lead_ahead) + ports(aside * sheets, lead_right)


def record(dry):
    """Saturation and band limiting: peaks are squeezed under a ceiling, then the top is cut off."""
    ceiling, top_hz = .93, 16500
    soft = dry / (1 + np.abs(dry / ceiling) ** 6) ** (1 / 6)
    return filtered(soft, lambda hz: hz < top_hz)


dry = scene()
out = record(dry)
to_wav(out)
```